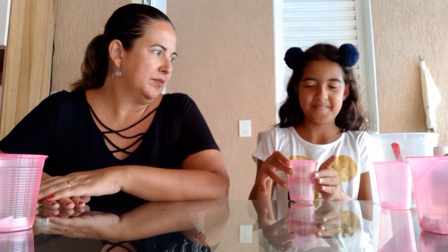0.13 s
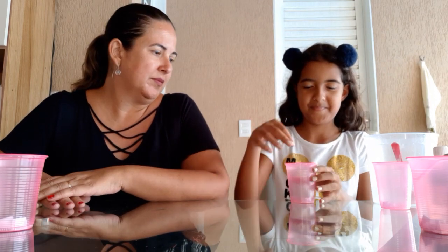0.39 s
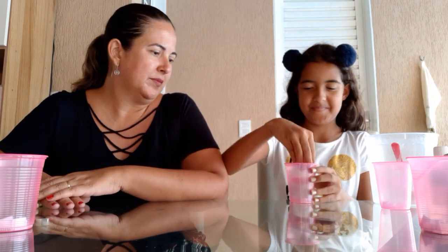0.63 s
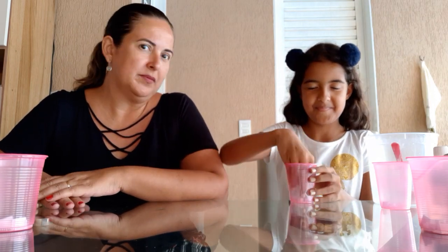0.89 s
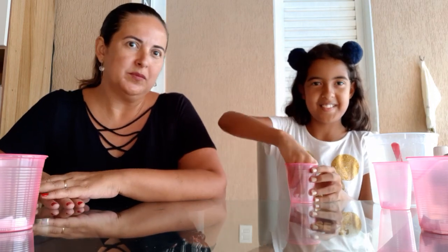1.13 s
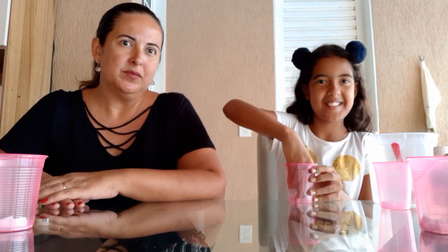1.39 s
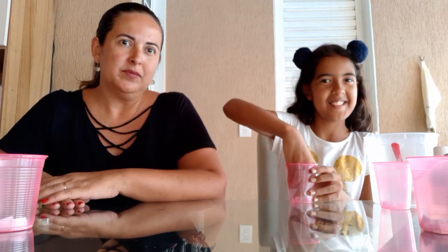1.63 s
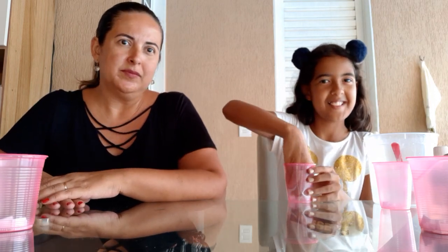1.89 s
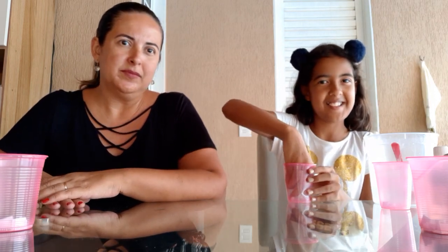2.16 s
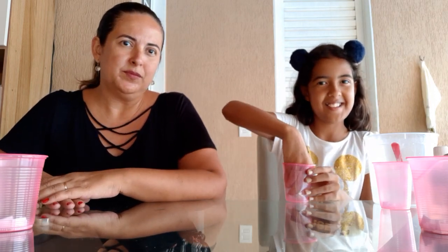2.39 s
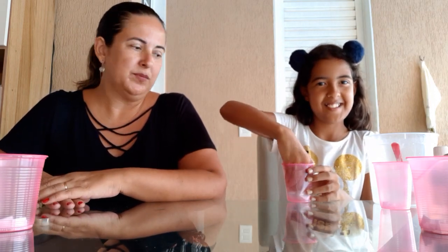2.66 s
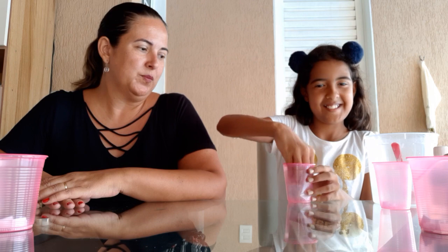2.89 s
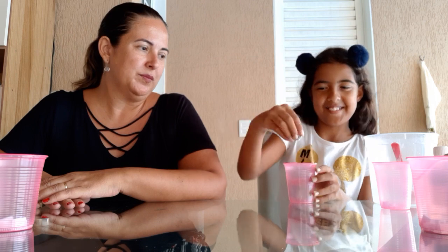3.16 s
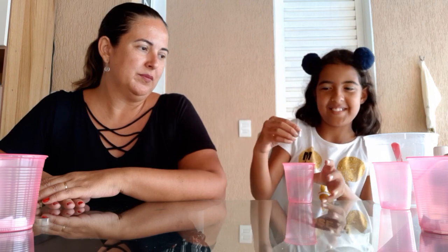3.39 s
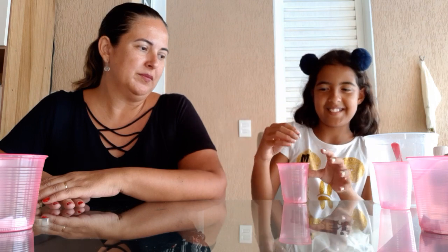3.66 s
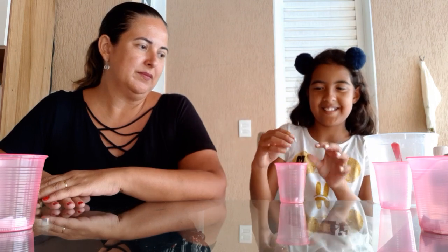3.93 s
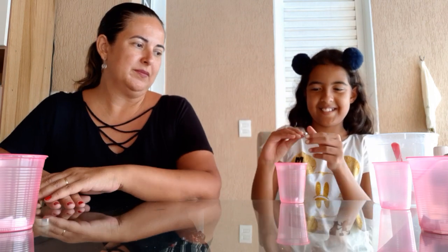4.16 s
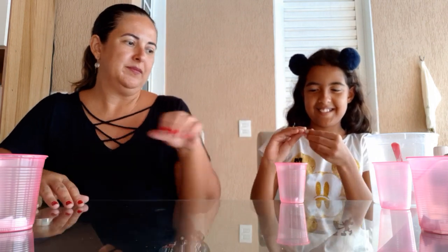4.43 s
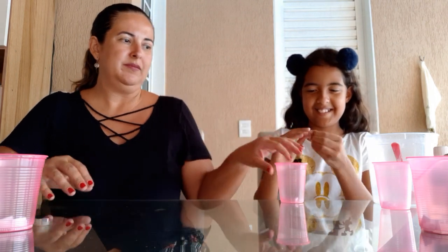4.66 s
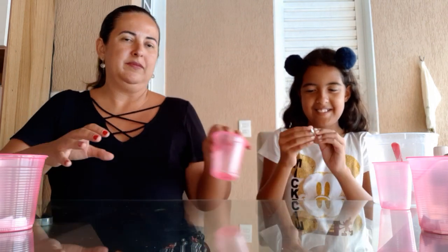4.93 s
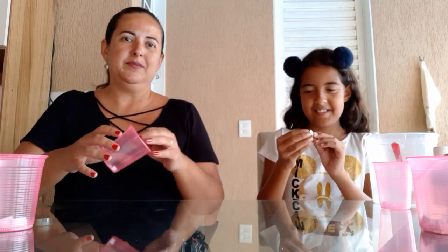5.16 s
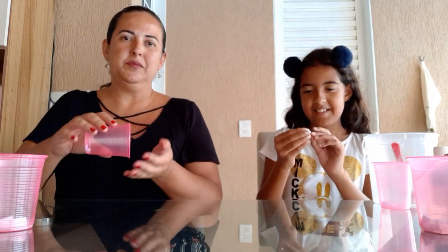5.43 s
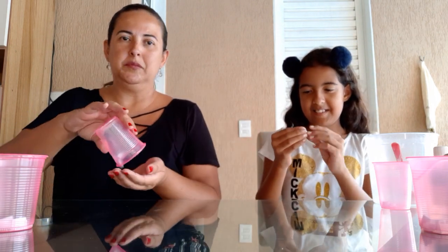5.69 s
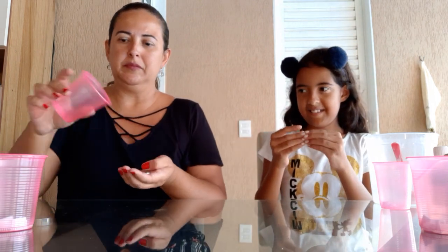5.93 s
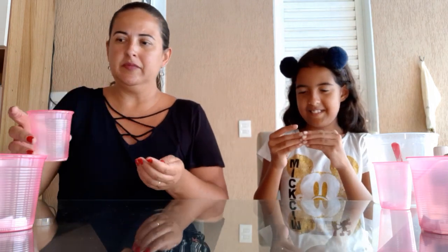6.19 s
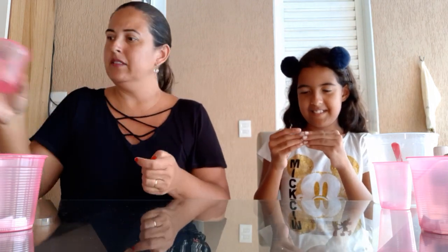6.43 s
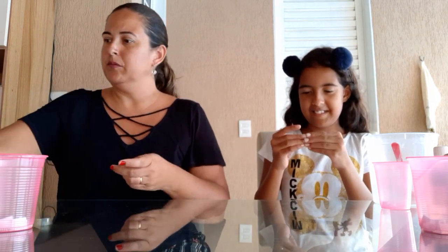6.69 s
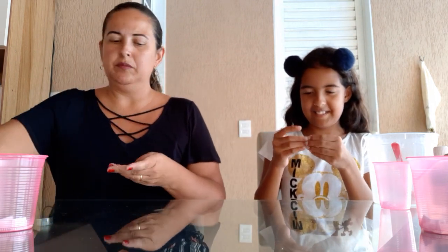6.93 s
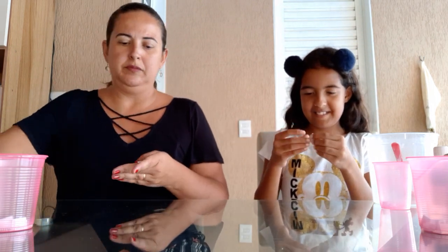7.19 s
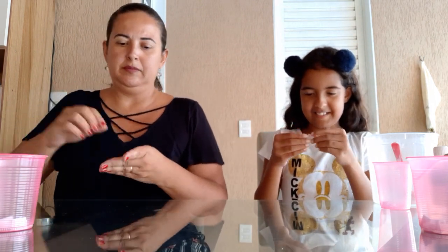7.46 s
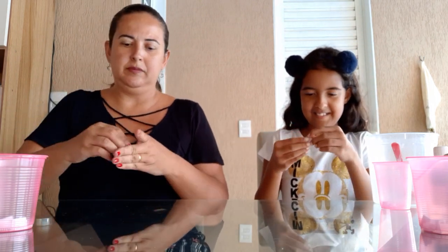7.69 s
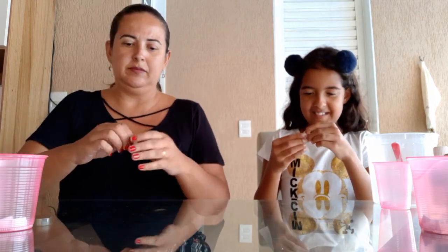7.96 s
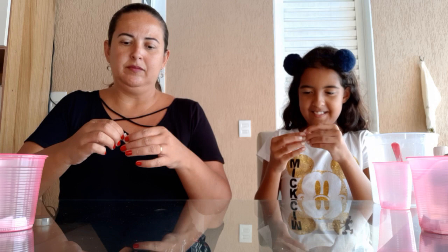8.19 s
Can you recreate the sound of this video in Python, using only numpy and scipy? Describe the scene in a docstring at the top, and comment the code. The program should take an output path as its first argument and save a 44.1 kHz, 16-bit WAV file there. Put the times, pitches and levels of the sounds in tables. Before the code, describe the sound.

Fingers rustle and snap folded paper in a hollow plastic cup on a glass table, the sharp crackles thinning to near silence.

```python
"""Paper slips in a plastic cup

Fingers stir, snap and unfold small paper slips in a thin plastic cup on a glass table, near a pair of microphones.
Snaps are short ragged pushes that thump the air in the cup, ring its wall and crack; rustling is dense tiny slips.
The cup rings when held loosely. A small bare room answers with sparse echoes, over a mains hum,
a far engine, a few far birds (falling sines) and room tone shaped from noise."""
import sys
import numpy as np
from scipy import signal
from scipy.fft import rfft, irfft, next_fast_len
from scipy.io import wavfile
from scipy.ndimage import uniform_filter1d, map_coordinates

SR = 44100
rng = np.random.default_rng(int(sys.argv[2]) if len(sys.argv) > 2 else 0)


def inscribe(sig):
    """Save sig as 16-bit PCM at rate SR to the path in sys.argv[1].

    A 1-D sig is mono; a 2-D sig holds one channel per row.
    Samples are clipped to [-1, 1] before scaling.
    """
    pcm = np.round(np.clip(np.atleast_2d(sig).T, -1, 1) * 32767)
    wavfile.write(sys.argv[1], SR, pcm.astype(np.int16))


def volts_from_db(level):
    """Convert decibel levels to linear amplitude ratios."""
    exponent = np.asarray(level, float) / 20
    return 10 ** exponent


N = 367429

# Strokes of rustling. Each row: start in seconds, length in seconds including most of its soft rise and fall,
# paper rubbing in dB, how much more sounds through the cup in dB.
STROKES = [(0, .042, -58, 14), (0.045, .12, -57, 5), (0.149, 0.032, -47.5, 8.5), (.2, 0.07, -57, 6),
           (.303, 0.043, -49.5, 4.5), (0.359, 0.13, -68.5, 3), (.544, .11, -88.5, 22.5),
           (0.681, 0.11, -60.5, 6), (0.792, 0.036, -55, 6), (0.85, 0.027, -54, 3.5),
           (0.891, 0.11, -67, -1.5), (.995, 0.029, -57.5, 1), (1.035, 0.027, -57, 7),
           (1.075, 0.085, -56.5, 2.5), (1.273, 0.028, -60, -2), (1.332, 0.089, -56, -1.5),
           (1.498, 0.22, -71, -1), (1.745, .096, -76.5, 4), (1.899, 0.041, -68, 5),
           (2.724, 0.17, -78.5, -8), (2.849, .11, -57, 1.5), (3.371, 0.23, -77, 6.5), (3.61, 0.066, -66, 3),
           (3.827, .13, -71, 4.5), (3.958, .11, -66.5, -2), (4.28, 0.1, -65.5, 9), (4.739, 0.043, -63, 2),
           (4.774, 0.14, -59.5, 7.5), (4.971, .03, -52.5, 14), (5.023, 0.083, -67, 12),
           (5.148, 0.039, -56.5, 8.5), (5.218, .1, -58, 0), (5.405, .16, -76, 2.5), (5.605, .19, -73, 1.5),
           (5.878, 0.19, -75.5, 5.5), (6.372, .17, -78.5, 1), (7, 0.22, -77, 2), (7.572, .22, -89.5, -6),
           (8.048, 0.059, -86, -15.5)]
# How the cup is held. Each row: time in seconds, freedom of the wall to ring from 0 to 1,
# pitch of the air left in the cup in Hz.
GRIP = [(0, 0.44, 1200), (.35, 0.3, 1070), (.62, 0, 420), (.67, 0.13, 930), (1.1, 0.1, 776),
        (2.1, 0.02, 1137), (2.29, 0.15, 723), (2.5, .1, 957), (3.05, 0.3, 963), (3.1, 0.27, 1150),
        (3.4, 0, 1074), (4.3, 0.44, 1041), (4.7, 0.08, 960), (4.85, 0.73, 1170), (5.4, 0.43, 1114),
        (6.2, 0.17, 1080), (6.8, 0.4, 520), (7.05, 0.32, 1096)]
# Modes of the cup wall. Each row: frequency in Hz, relative level in dB, t60 of the free wall in seconds.
CUP_WALL = [(617, -24.5, 0.79), (1049, -4.5, 0.22), (1315, 0, 0.16), (1910, -11.5, 0.21),
            (2633, -25.5, 0.16), (4054, -16.5, 0.13), (4970, -19, 0.032)]
# Where the hands are. Each row: time in seconds, lag of left behind right in samples,
# left minus right in dB, extra echo with distance in dB.
HANDS = [(0, -2.5, 0.5, -2), (4.2, -2.5, 0.5, -2), (4.7, 8, -8, 1), (5.1, 7.5, -2.5, -3),
         (6.3, 9.5, -0.5, -0.5), (6.8, 19.5, -3, 6), (7.3, 17.5, -3.5, 5), (7.7, 6, -1.5, 2.5)]


def evened(x):
    """Scales to an rms of 1."""
    return x / np.sqrt(np.mean(x ** 2) + 1e-20)


def peaked(x, db):
    """Scales to a peak in dB."""
    return volts_from_db(db) * x / abs(x).max()


def read(points, hz):
    """Reads a curve over frequency, straight between its points on a log axis."""
    f, value = np.transpose(points)
    return np.interp(np.log(hz + 1), np.log(f + 1), value)


def follow(rows, t):
    """Reads every column of a timed table at the times t."""
    s, *columns = np.transpose(rows)
    return [np.interp(t, s, c) for c in columns]


def add(mix, s, sound):
    """Mixes a sound in at s seconds."""
    part = mix[round(s * SR):][:len(sound)]
    part += sound[:len(part)]


def resonate(x, hz, width_hz):
    """A resonance of gain 1 that follows the curve hz: shift down to zero, smooth, shift back."""
    turn = np.exp(2j * np.pi * np.cumsum(hz * np.ones(len(x))) / SR)
    r = np.exp(-np.pi * width_hz / SR)
    return 2 * (turn * signal.lfilter([1 - r], [1, -r], x / turn)).real


def colour(points, size=1024):
    """Causal minimum-phase impulse response of a spectrum, floored at -80 dB."""
    hz = abs(np.fft.fftfreq(size, 1 / SR))
    log_gain = np.log(volts_from_db(np.maximum(read(points, hz), -80)))
    return np.fft.ifft(np.exp(np.conj(signal.hilbert(log_gain)))).real[:size // 2]


def waver(top_hz):
    """Random drift of rms 1: sines of random phase from 0.2 Hz up to top_hz, weaker as they quicken."""
    t = np.arange(0, N + 100, 100) / SR
    rates_hz = np.geomspace(.2, top_hz, num=16)
    drift = sum(np.sin(2 * np.pi * (f * t + rng.random())) / np.sqrt(f) for f in rates_hz)
    return evened(np.interp(np.arange(N) / SR, t, drift))


def snaps():
    """Each snap is a few milliseconds of ragged force: it thumps the air in the cup, rings its wall and cracks."""
    # The clearest creases and nails snapping. Each row: start in seconds, thump in the cup, crack
    # and crisp edge as peaks in dB, time scale of the force in ms.
    clear_snaps = [(0.002, -24, -32, -66, 3.04), (0.059, -35, -30, -50, 3.4), (0.1, -37.5, -35, -59, 3.6),
                   (0.126, -31, -35, -40, 2.6), (0.173, -23.5, -26, -29, 2.7), (0.194, -27, -30, -37, 2.6),
                   (0.218, -23, -20.5, -23.5, 4.2), (0.298, -39, -36, -56, 2.6),
                   (0.322, -38, -28, -58, 2.75), (0.412, -38, -42.5, -42, 2.9), (0.805, -46, -46, -30, 2.4),
                   (0.859, -42, -31.5, -26, 3), (1.024, -52, -37, -28.5, 1.77),
                   (1.042, -47.5, -52, -58, 1.9), (1.084, -39.5, -52, -57, 3.2),
                   (1.14, -49, -36.5, -36.5, 5.3), (1.209, -24, -20.5, -27.5, 3.4),
                   (1.348, -41.5, -57, -54, 3), (1.361, -45.5, -51, -41, 2.8),
                   (1.375, -38, -29, -35.5, 2.6), (1.479, -43.5, -69, -50, 2.4),
                   (1.634, -49, -41.5, -66, 1.93), (1.913, -42.5, -51, -68, 3.9), (1.925, -32, -47, -70, 3),
                   (2.1, -32.5, -25.5, -26, 2.94), (2.289, -16.5, -15.5, -18, 3.25),
                   (2.485, -38, -49, -70, 2.8), (2.523, -24, -37, -61, 3.6), (2.546, -19, -14, -22.5, 3.28),
                   (2.574, -23.5, -13, -20, 3.3), (2.581, -35, -27, -41, 3), (2.634, -29.5, -24, -38, 3.3),
                   (2.641, -27, -18.5, -14, 3.5), (2.655, -27.5, -24, -27, 3), (2.747, -35, -36, -62, 2.1),
                   (2.862, -40.5, -35, -35, 4.3), (2.895, -34.5, -30, -83, 3.37),
                   (3.057, -14.5, -19.5, -25, 3), (3.061, -21, -31, -44, 2.7), (3.486, -64, -63, -52, 3.9),
                   (3.618, -49.5, -44.5, -58.5, 5.2), (4.781, -34.5, -43.5, -64, 3.1),
                   (4.825, -32, -38, -47, 2.66), (4.897, -18.5, -19.5, -24.5, 2.86),
                   (4.978, -52, -28, -57, 2.24), (4.988, -32, -41, -54, 3), (5.044, -38, -47, -67, 2.5),
                   (5.148, -46, -33, -43, 2.6), (5.229, -42, -33.5, -49, 2),
                   (5.267, -41.5, -42, -30.5, 4.1), (5.725, -50, -72, -42, 3), (5.762, -69.5, -67, -53, 3),
                   (5.888, -61, -65, -52, 2.4), (5.986, -48.5, -48.5, -56, 4.3),
                   (6.386, -60.5, -59, -74, 7.3), (6.907, -35.5, -36, -40.5, 3.27),
                   (8.254, -60, -45.5, -32, 3)]
    # Spectrum of the crack. Each row: frequency in Hz, relative level in dB per Hz.
    crack_spectrum = [(880, -24.5), (1500, -14.5), (2080, -1), (2430, -8), (2920, -0.5), (3240, -0.5),
                      (4120, 1), (4570, -5.5), (6000, -4.5), (7800, -36), (13200, -120)]
    # Spectrum of the crisp edge. Each row: frequency in Hz, relative level in dB per Hz.
    edge_spectrum = [(2940, -42.5), (5000, -2), (6290, -5.5), (7340, -3), (9010, -10.5), (13800, -17),
                     (16000, -38.5)]
    pitch_spread = 0.18  # each thump finds the air in the cup a little higher or lower

    out, t = np.zeros(N), np.arange(7000) / SR
    rows = list(clear_snaps) + ticks()
    draws = rng.standard_normal((len(rows), 2, 1000))
    crack, edge = colour(crack_spectrum), colour(edge_spectrum)
    for (s, thump_db, crack_db, edge_db, ms), (a, b) in zip(rows, draws):
        u = t[:1000] * 1000 / ms
        force = 1.4 * a * volts_from_db(1.9 * b) * np.sqrt(u) * np.exp(-2.5 * u)  # fast rise, ragged fall
        force[round(.25 * ms * SR / 1000)] += 1.1  # one main slip stands out

        free, hz = follow(GRIP, s)
        free = np.clip(free, .02, 1)
        # a tighter grip shortens the ring
        wall = sum(volts_from_db(db - 60 * t / (t60 * free)) * np.sin(2 * np.pi * f * t) for f, db, t60 in CUP_WALL)
        long_force = np.pad(force, (0, len(t) - 1000))
        thump = peaked(resonate(long_force, hz * (1 + pitch_spread * b[0]), 160), 0) * (1 - free)
        ring = peaked(signal.fftconvolve(force, wall)[:len(t)], 0) * free

        add(out, s + .0006, peaked(thump + ring, thump_db))
        # the crease gives way just after the push
        add(out, s + 0.0007235, peaked(np.convolve(force, crack), crack_db))
        add(out, s + 0.00063, peaked(np.convolve(force, edge), edge_db))
    return signal.lfilter(*signal.butter(2, 250, "high", fs=SR), out)  # a small cup radiates no bass


def ticks(count=2):
    """Small snaps at chance moments of each stroke, as rows like those of the clear snaps."""
    above_db, spread_db, ms = 12, 4, 2  # most above the stroke's own level, mean fall below that, time scale
    hiss_db = 2  # extra level of the crisp edge
    rows = []
    draws = rng.random((len(STROKES), count, 4))
    for (s, length, db, cup_db), stroke_draws in zip(STROKES, draws):
        for u, *size in stroke_draws:
            levels_db = db + above_db + np.array([cup_db, 0, hiss_db]) + spread_db * np.log(size)
            rows.append((s + length * u, *levels_db, ms))
    return rows


def rustle():
    """About 2000 tiny slips a second in each stroke; one part sounds through the cup, the rest is bare paper."""
    # Spectrum of paper rubbing. Each row: frequency in Hz, relative level in dB per Hz.
    rub_spectrum = [(880, -33.5), (1500, -21.5), (1910, -7), (2320, -1.5), (2670, -2.5), (3290, -9),
                    (4010, 2.5), (5200, -9), (6760, -19.5), (11400, -120)]
    # Spectrum of the dry hiss. Each row: frequency in Hz, relative level in dB per Hz.
    hiss_spectrum = [(2940, -35.5), (5000, -4.5), (5790, -4), (7900, -2.5), (9010, -11), (10900, -10),
                     (16000, -36)]
    hiss_db, muffle = 2, 0.83  # hiss beside the rubbing; dB of hiss lost for each dB that goes through the cup
    soft_end_s = .034  # rise and fall of a stroke; a short stroke is all rise and fall, with no level middle

    power = np.zeros((3, N))  # through the cup, rubbing, hiss
    for s, length, db, cup_db in STROKES:
        whole = length + soft_end_s * 2 / 3
        shape = signal.windows.tukey(round(whole * SR), min(2 * soft_end_s / whole, 1)) ** 2
        for row, part_db in zip(power, (cup_db, 0, hiss_db - muffle * cup_db)):
            # overlapping strokes add in power
            add(row, max(s - soft_end_s / 3, 0), volts_from_db(2 * (db + part_db)) * shape)

    free, hz = follow(GRIP, np.arange(N) / SR)
    free = np.clip(free, .05, 1)
    clumps = volts_from_db(3 * waver(90))
    sizes = volts_from_db(3 * np.minimum(rng.exponential(1, N), 4))
    happens = rng.random(N) < 2000 / SR
    grains = clumps * rng.standard_normal(N) * sizes * happens

    cup_air = evened(resonate(resonate(grains, hz, 321), hz, 321))
    cup_air += 0.44 * evened(resonate(grains, 2.05 * hz, 200))  # its second resonance
    wall = evened(sum(volts_from_db(db) * evened(resonate(grains, f, 6 / t60)) for f, db, t60 in CUP_WALL))
    through_cup = (1 - free) * cup_air + free * wall
    rub = evened(signal.oaconvolve(grains, colour(rub_spectrum))[:N])
    hiss = evened(signal.oaconvolve(grains, colour(hiss_spectrum))[:N])
    return (np.sqrt(power) * [through_cup, rub, hiss]).sum(0)


def knocks():
    """The cup or a wrist knocks the table top: a dull, quickly damped double note."""
    # Each row: start in seconds, peak in dB.
    hits = [(1.208, -30), (1.375, -41), (1.926, -47), (2.288, -44.5), (3.058, -50), (4.893, -46.5),
            (6.905, -42)]
    # Modes of the table top. Each row: frequency in Hz, relative level in dB, t60 in seconds.
    table_top = [(464, 4.5, 0.02), (310, -5.5, .022)]
    out, t = np.zeros(N), np.arange(3000) / SR
    note = sum(t * volts_from_db(db - 60 * t / t60) * np.sin(2 * np.pi * hz * t) for hz, db, t60 in table_top)
    for s, db in hits:
        add(out, s, peaked(note, db))
    return out


def at_microphones(x):
    """The nearer microphone hears the hands first and louder; the balance also leans with frequency."""
    # Lean of near sounds. Each row: frequency in Hz, left minus right in dB.
    lean = [(200, 1.5), (600, 2), (1400, 0), (5000, -1), (10000, 8.5)]
    n, size = np.arange(N), next_fast_len(N)
    lag, pan_db, _ = follow(HANDS, n / SR)
    pair = np.array([volts_from_db(side * pan_db / 2) * map_coordinates(x, [n - side * lag / 2], order=3)
                     for side in (1, -1)])
    lean_db = read(lean, np.fft.rfftfreq(size, 1 / SR)) / 2
    return irfft(rfft(pair, size) * volts_from_db(np.array([lean_db, -lean_db])), size)[:, :N]


def room(x, gap_s=0.008, longer=1, turn_rad_per_s=1600, count=3):
    """Sparse random echoes after a short gap, each band dying at its own speed.
    A few sets of echoes take steady quick turns, so that the tail sounds smooth."""
    # Decay of the small bare room, stretched by longer. Each row: frequency in Hz, t60 in seconds.
    decay = [(250, 0.55), (660, 0.37), (1740, 0.52), (4590, 0.49), (12100, 0.48)]
    out = np.zeros((2, N))
    turn = np.arange(N) / SR * turn_rad_per_s
    for k in range(count):
        taps = np.zeros((2, SR))
        at = np.arange(round(gap_s * SR), SR - 20, 20)
        places = at + rng.integers(0, 20, (2, len(at)))
        np.put_along_axis(taps, places, rng.choice([-1., 1.], (2, len(at))), 1)
        taps[1] = 0.15 * taps[0] + 0.81 * taps[1]  # the close pair shares part of each echo

        hz, t, z = signal.stft(taps, SR, nperseg=128)
        fall = volts_from_db(-60 * t / longer / read(decay, hz)[:, None])
        tail = signal.istft(z * fall, SR, nperseg=128)[1]
        share = np.sqrt(2 / count) * abs(np.cos(turn + k * np.pi / count))
        out += signal.oaconvolve((share * x)[None], tail / np.linalg.norm(tail[0]), axes=1)[:, :N]
    return out


def whistle(rows, rough_hz=0):
    """A sine along a pitch curve with soft ends and, where rough_hz is set, a quick random tremble."""
    t = np.arange(rows[0][0], rows[-1][0], 1 / SR)
    hz, db = follow(rows, t)
    hz = hz + rough_hz * evened(uniform_filter1d(rng.standard_normal(len(t)), size=60))
    tone = np.sqrt(2) * volts_from_db(db) * np.sin(2 * np.pi * np.cumsum(hz) / SR)
    return t[0], tone * signal.windows.tukey(len(t), .2)


def birds():
    """Far falling whistles and chirps, mostly heard as their long echoes."""
    # Each row: start in seconds, length in seconds, first pitch in Hz, last pitch in Hz,
    # level in dB ahead of the blend of direct sound and echo.
    calls = [(1.6, 0.033, 4440, 4100, -64), (1.8, 0.12, 4650, 4110, -70.5),
             (3.805, .024, 8260, 6900, -81.5), (4.21, 0.3, 4025, 3800, -75),
             (4.445, 0.019, 8340, 6900, -72.5), (4.526, 0.018, 7940, 6900, -69),
             (4.55, 0.1, 5000, 4180, -62.5), (6.86, .04, 5340, 4820, -66), (7.57, 0.072, 4480, 3950, -67)]
    out = np.zeros(N)
    for s, length, first_hz, last_hz, db in calls:
        add(out, *whistle([(s, first_hz, db), (s + length, last_hz, db)], rough_hz=70))
    return 0.54 * out + 1.1 * room(out, longer=2.3, turn_rad_per_s=760, count=2)


def drone():
    """Mains hum, wavering in level and phase, and a gliding far engine note."""
    # The far engine. Each row: time in seconds, pitch in Hz, level in dB.
    engine_note = [(0.6, 129.4, -57), (0.75, 137.3, -59), (1.86, 146.1, -67.5), (2.74, 152.6, -58.5),
                   (2.85, 144, -73)]
    # The hum. Each row: frequency in Hz, middle level in dB.
    hum_tones = [(177.6, -69.5), (236.9, -76.5)]
    t, engine = np.arange(N) / SR, np.zeros(N)
    add(engine, *whistle(engine_note))
    hum = 0
    for hz, db in hum_tones:
        level = np.sqrt(2) * volts_from_db(db + 4.1 * waver(3.6))
        hum = hum + level * np.sin(2 * np.pi * hz * t + 0.4 * waver(1.6))
    return engine + hum


def air():
    """Room tone and microphone hiss as shaped noise, partly alike in both ears; the bass follows the traffic."""
    # Spectrum of the room tone. Each row: frequency in Hz, relative level in dB per Hz.
    tone_spectrum = [(25, -42), (45, -24.5), (65, -5), (120, 2.5), (220, -5), (320, -9), (800, -16.5),
                     (1300, -22), (3200, -25.5), (4000, -19.5), (5000, -25.5), (7500, -24.5), (9500, -35),
                     (13000, -26.5), (15500, -31.5), (16200, -44.5)]
    # Each row: frequency in Hz, likeness of left and right from -1 to 1.
    likeness = [(60, .88), (180, .88), (450, .6), (1000, .05), (2400, -.1), (15000, 0)]
    # Distant traffic; only its height above its lowest point counts. Each row: time in seconds, level in dB.
    traffic = [(0.0, -60.5), (0.83, -67), (4.38, -70.5), (6.73, -73.5), (8.33, -73.5)]
    level_db = -62.5  # rms of the whole bed

    frames, hz = N // 256 + 5, np.fft.rfftfreq(1024, 1 / SR)
    a, b, c, d = rng.standard_normal((frames, 513, 4)).T
    same = np.clip(read(likeness, hz), -1, 1)[:, None]
    left = a + 1j * b
    right = same * left + np.sqrt(1 - same ** 2) * (c + 1j * d)
    swell_db = follow(traffic, np.arange(frames) * 256 / SR)[0]
    bass = 1 / (1 + (hz / 450) ** 2)
    gain_db = read(tone_spectrum, hz)[:, None] + bass[:, None] * (swell_db - swell_db.min())
    z = np.array([left, right]) * volts_from_db(gain_db)
    return volts_from_db(level_db) * evened(signal.istft(z, nperseg=1024, noverlap=768)[1][:, :N])


def scene():
    """Hands near the microphones, the room behind them, the far sounds under all."""
    near = snaps() + knocks() + rustle()
    # the glass table returns each sound 1.2 ms later
    mirrored = signal.lfilter([1] + [0] * round(0.0012 * SR) + [.35], 1, near)
    echo_db = -4 + follow(HANDS, np.arange(N) / SR)[2]
    return at_microphones(mirrored) + room(near * volts_from_db(echo_db)) + birds() + drone() + air()


def roll_off(x):
    """The treble ends steeply here."""
    return signal.sosfilt(signal.butter(12, 16810, fs=SR, output="sos"), x)


def record(dry):
    """The deepest bass, below 38 Hz, is cut away."""
    mix = signal.lfilter(*signal.butter(2, 38, "high", fs=SR), dry)
    return roll_off(mix)


dry = scene()
out = record(dry)
inscribe(out)
```